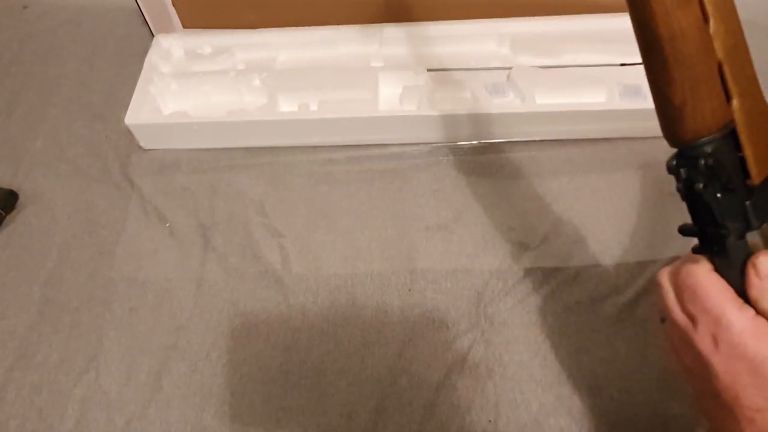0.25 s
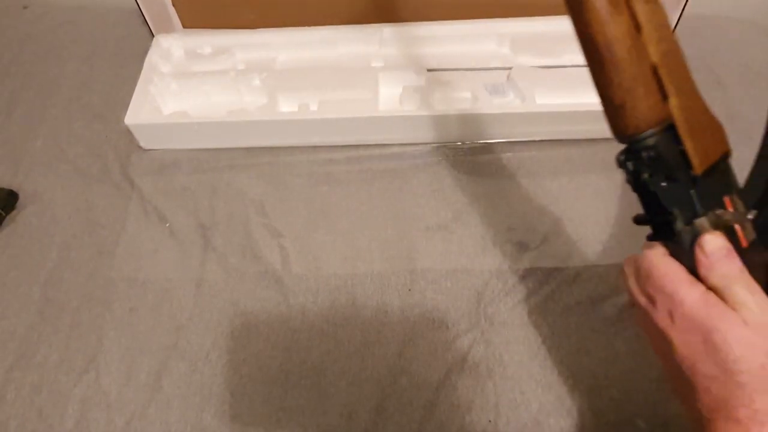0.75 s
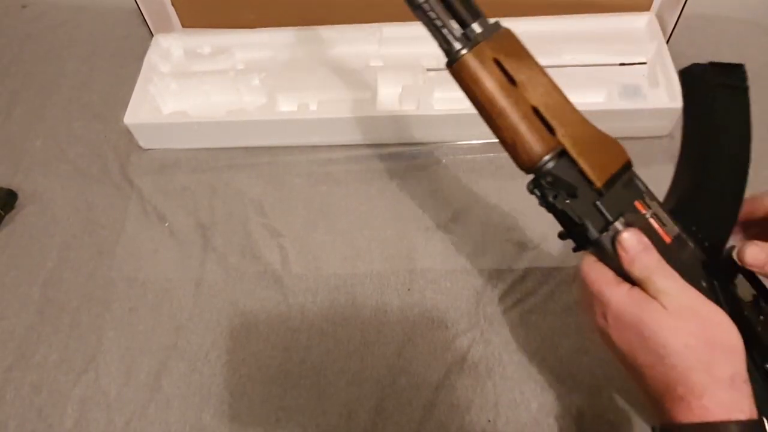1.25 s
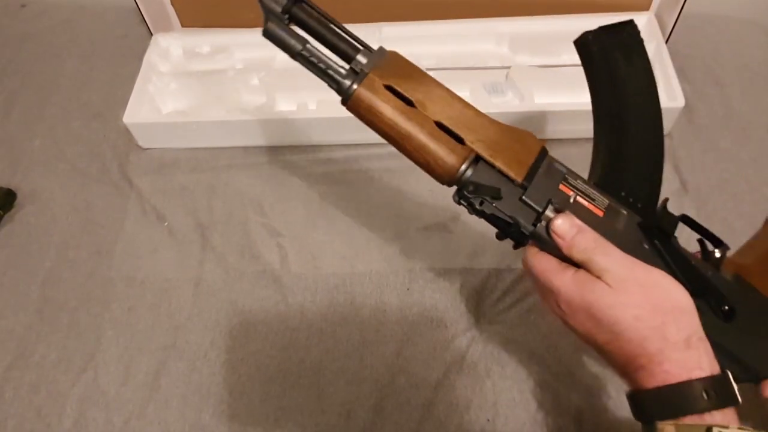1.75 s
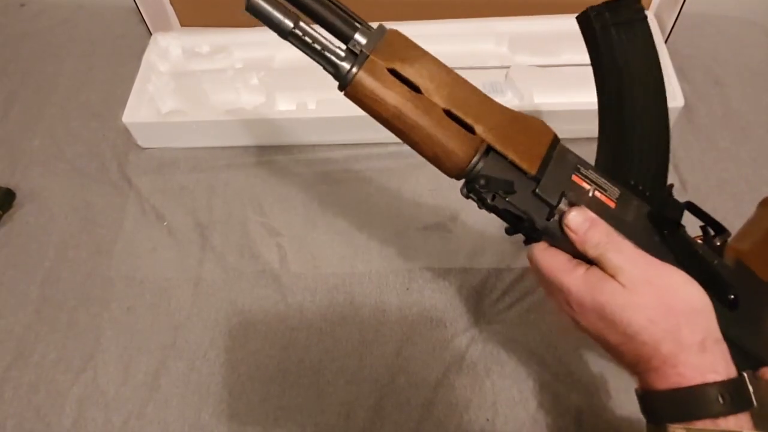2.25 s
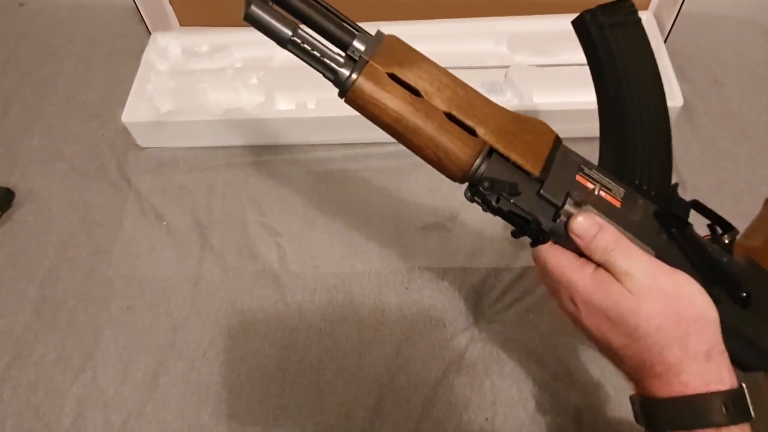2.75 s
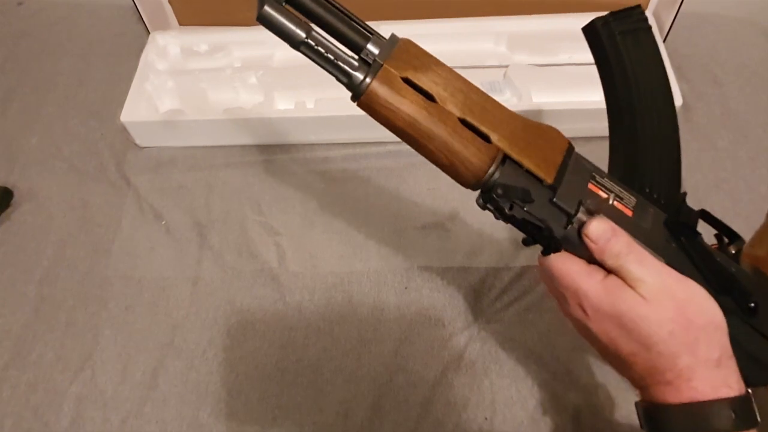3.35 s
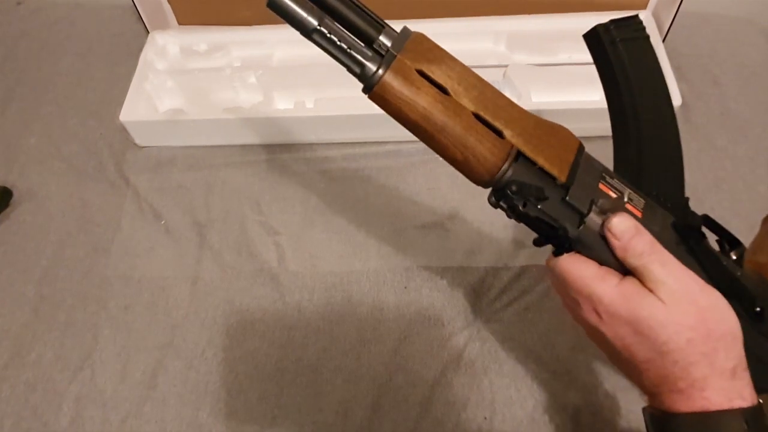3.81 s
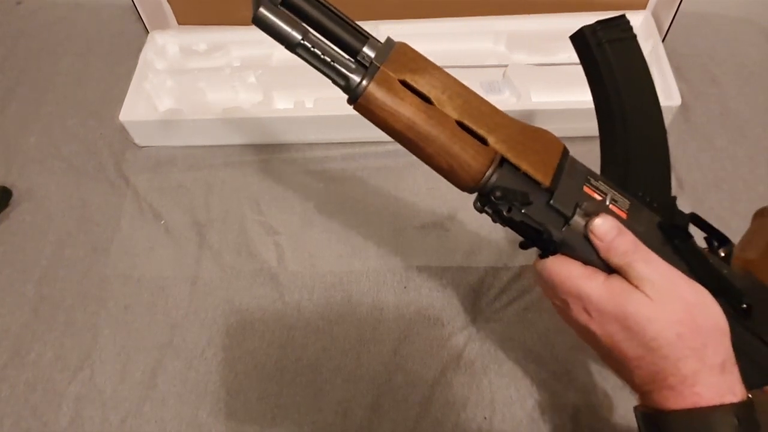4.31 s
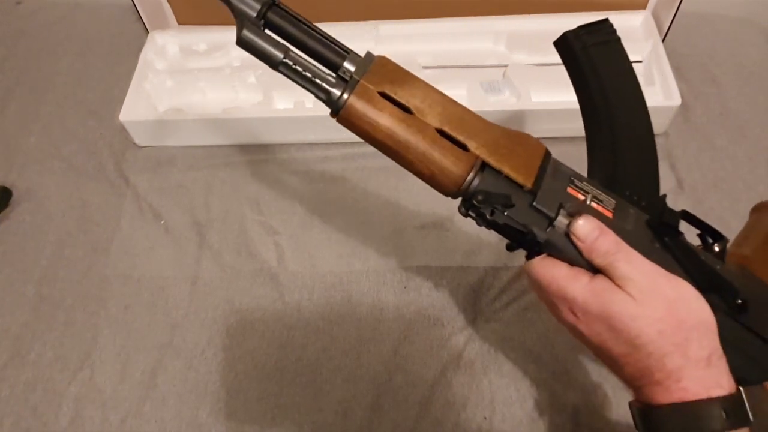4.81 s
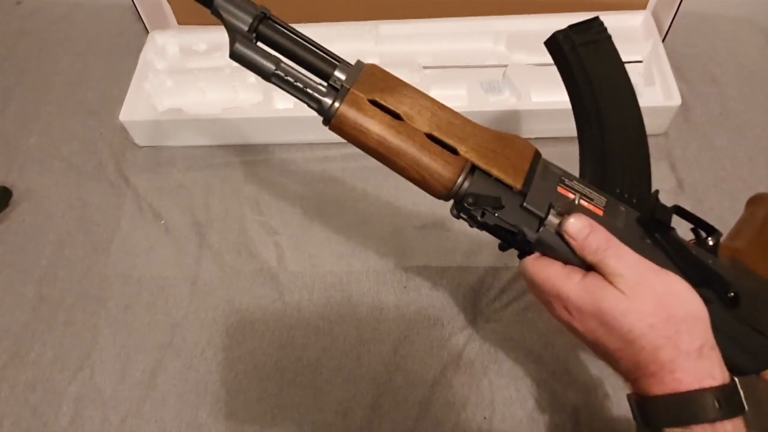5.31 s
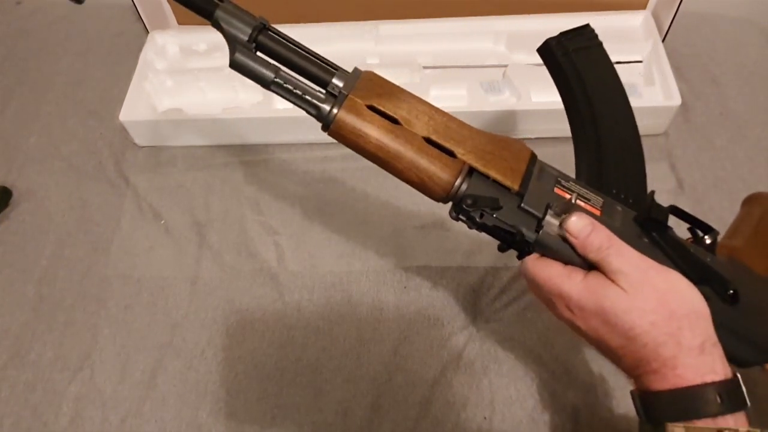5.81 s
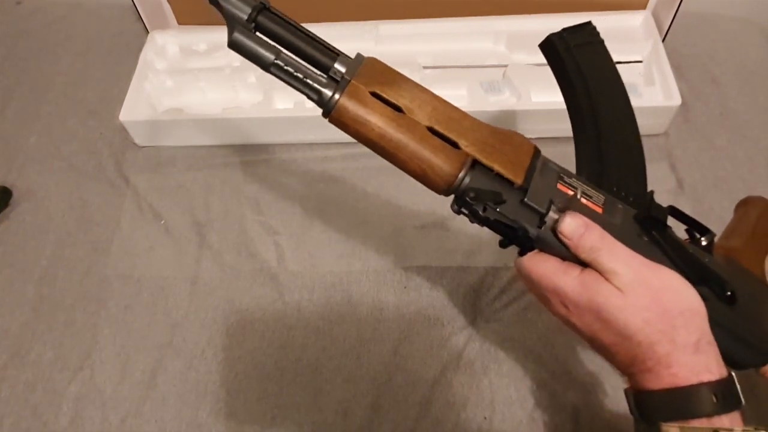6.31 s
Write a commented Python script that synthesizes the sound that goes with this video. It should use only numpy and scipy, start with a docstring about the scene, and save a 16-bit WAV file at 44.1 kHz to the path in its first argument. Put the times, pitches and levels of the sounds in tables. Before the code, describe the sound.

A plastic and metal toy rifle is handled with light knocks and ticks, then a part snaps home in three loud clacks.

```python
"""A toy rifle of plastic and metal is turned in the hands while a part is fitted back on.
Plastic pieces knock, loose fittings tick, fingers rub the shell, and the part catches, then snaps
home in three loud clacks. Each hit is a dry crack; resonances of the room and rifle ring on briefly.
A phone close by in the small furnished room hears it over low rumble, faint hum and its own hiss."""
import sys
import numpy as np
from scipy import signal
from scipy.fft import rfft, irfft
from scipy.io import wavfile
from scipy.ndimage import uniform_filter1d

SR = 44100
rng = np.random.default_rng(int(sys.argv[2]) if len(sys.argv) > 2 else 0)


def wrap_up_sound(samples):
    """Save the sound to the file named by the first command line argument, as 16-bit audio."""
    columns = np.atleast_2d(samples).T
    # keep every value between -1 and 1, then stretch to whole-number steps
    tamed = np.clip(columns, -1, 1)
    steps = np.round(tamed * 32767).astype(np.int16)
    wavfile.write(sys.argv[1], SR, steps)


N = 289296


def rifle_hits(gain_db=11.5, pan_db=1.54):
    """Snaps, knocks and ticks all crack and set off the same resonances, a little to the left."""
    # The part catches, then clacks home three times. Each row: start in seconds, relative level in dB,
    # low knock in dB, resonance of the part in Hz, chatter time in milliseconds.
    snaps = [(2.962, -14, -5, 1850, 1.83), (5.328, -6.5, -3, 1227, 2.8), (5.6204, -11.5, 4.5, 1850, 3.26),
             (5.73, -1.56, -2, 1300, 2.1)]
    # Plastic pieces knock together. Each row: start in seconds, relative level in dB, low knock in dB,
    # hardness (extra treble) in dB, resonance of the part in Hz.
    knocks = [(.001, -24.5, -2.5, -17.5, 2380), (.021, -24, 3, -8, 3700), (.682, -37.5, 2, -10, 1650),
              (.7023, -26, -11, -13.5, 1770), (.763, -37, 5.5, -10.5, 1840), (1.029, -35, 3, 1.5, 1750),
              (1.137, -40, 13.5, -10.5, 1210), (2.3104, -35, -1.5, 0.5, 1630), (2.899, -28.5, 2, -9, 1450),
              (2.909, -33, 7, 5, 2840), (3.046, -36.5, 0, 0, 1420), (3.1222, -40.5, -10, 0, 1400),
              (3.2126, -31.5, -14, -5.5, 1340), (3.966, -26.5, 2.5, -14, 3330),
              (4.1065, -30.5, -1, 4.5, 795), (4.236, -32.5, -7, -8, 2390), (4.252, -27, -0.5, 1.5, 2350),
              (4.9687, -27, 0, -9, 898)]
    # Loose metal fittings tick. Each row: start in seconds, relative level in dB.
    ticks = [(0.2158, -43.5), (.3018, -48.5), (0.357, -49), (0.928, -36.5), (1.109, -46), (1.38, -50.5),
             (2.079, -49), (2.101, -53), (2.211, -45), (3.178, -46), (6.4458, -51.5), (6.5, -55.5)]
    hits = [(s, contact(db, knock, hard_db=2.8, hz=hz, chatter_ms=ms)) for s, db, knock, hz, ms in snaps]
    hits += [(s, contact(*settings)) for s, *settings in knocks]
    hits += [(s, contact(db, knock_db=2, hard_db=5.5, hz=8230, chatter_ms=3)) for s, db in ticks]
    cracks, rings = np.zeros((2, 2, N))
    gain = undb(gain_db + np.array([[pan_db], [-pan_db]]) / 2)
    for start_s, (crack_sound, ring_sound) in hits:
        add(cracks, start_s, gain * crack_sound)
        add(rings, start_s, gain * ring_sound)
    return cracks, rings


def contact(db, knock_db, hard_db, hz, chatter_ms=None, ring_db=-8):
    """One hit gives a dry crack and a stereo ring; harder hits are brighter."""
    # Unless a chatter time is given, every 23.5 dB of hardness halves it.
    chatter_ms = chatter_ms or 2.34 * 2 ** (-hard_db / 23.5)
    touch = touch_tone(knock_db, clack_db=0.29 * hard_db, snap_db=hard_db)
    tone = undb(db) * through(touch, struck_part(hz, db))
    crack_sound = through(crack(chatter_ms), tone)
    ring_sound = undb(ring_db) * np.array([through(side, tone) for side in resonant_ring()])
    return crack_sound, ring_sound


def crack(chatter_ms, shell_t60=0.02, shell_db=-4):
    """Two parts chatter as they meet, then the shell's many vibrations blur the hit."""
    # The tone of the dry crack. Each row: frequency in Hz, level in dB.
    crack_tone = [(20, -52), (70, -25), (150, -21.5), (420, -10), (510, -8.5), (700, -2.5), (1200, -1.5),
                  (2100, -2), (3000, -5.5), (4500, -3.5), (5700, -5), (9000, -10), (12000, -19.5),
                  (15500, -34)]
    t = np.arange(SR // 8) / SR
    progress = t * 1000 / max(chatter_ms, .3)
    chatter = burst(np.sqrt(progress) * np.exp(-progress ** 2), smooth_hz=280)
    shell = burst(undb(-60 * t / shell_t60) * (1 - np.exp(-progress)), smooth_hz=250)
    return through(unit(chatter + undb(shell_db) * shell), unit(response(*np.transpose(crack_tone))))


def resonant_ring(scatter_db=2, build_s=0.0021, spread_rad=.7):
    """Resonances of the room and rifle ring on briefly after each hit, in a different mix each time."""
    # The ringing notes. Each row: pitch in Hz, relative level in dB, seconds to fade by 60 dB (t60).
    ring_notes = [(182.7, -15.5, 0.11), (506, 6.5, 0.2), (535, -2, 0.27), (563, -5, 0.11), (769, 2, 0.25),
                  (873, -12.5, 0.19), (1000, -5, .17), (1096, -10.5, 0.069), (1210, -1.5, 0.18),
                  (1315, -6.5, 0.29), (1455, -4, .2), (1850, -2, 0.074), (1942, -4, 0.095),
                  (2072, -1, 0.036), (2300, -5.5, 0.15), (2810, -16.5, 0.31), (4020, 4, 0.077),
                  (4100, -7, 0.18), (5260, -8.5, .21), (5100, -1, 0.31), (5150, -6.5, 0.16),
                  (5782, -20.5, 0.11), (6200, 2, 0.11)]
    t = np.arange(SR // 3) / SR
    hz, db, t60 = np.transpose(ring_notes)[:, :, None]
    strength = undb(db + scatter_db * rng.standard_normal(hz.shape))
    phase = 2 * np.pi * rng.random(hz.shape)
    mic_shift = spread_rad * np.sqrt(hz / 500) * rng.standard_normal((2, *hz.shape))
    fade = unit(undb(-60 * t / t60) * (1 - np.exp(-t / build_s)))
    return unit(np.sum(strength * fade * np.sin(2 * np.pi * hz * t + phase + mic_shift), axis=1))


def struck_part(hz, force_db, boost_db=6, octaves=0.31, latch_hz=5550, latch_db=4, latch_octaves=0.11):
    """The struck part boosts a broad band of pitches; the hardest hits also ring the metal latch."""
    grid_hz = np.geomspace(100, SR / 2, num=200)
    resonance = boost_db * np.exp(-(np.log2(grid_hz / hz) / octaves) ** 2)
    latch = latch_db * undb(force_db) * np.exp(-(np.log2(grid_hz / latch_hz) / latch_octaves) ** 2)
    return response(grid_hz, resonance + latch - 2)


def touch_tone(knock_db, clack_db, snap_db):
    """The tone of one contact: soft ones knock, hard edges snap."""
    return response([250, 450, 570, 800, 1300, 1900, 3000, 4500],
                    [knock_db / 2, knock_db, knock_db, 0, 0, clack_db, clack_db, snap_db])


def finger_rubs(grains_per_s=800, spread_db=5.5, grain_ms=1.26, gain_db=2):
    """Skin catches and slips on the shell in tiny clicks; dull strokes have less treble, more knock."""
    # Finger strokes. Each row: middle in seconds, half length in seconds, relative level in dB,
    # dullness in dB.
    strokes = [(.455, .11, -68, 18.5), (0.886, .025, -63.5, 6.5), (1.451, 0.17, -69.5, -2.5),
               (1.882, 0.26, -65, 0.5), (2.291, 0.065, -63.5, 7.5), (2.72, .1, -69, 1.5),
               (6.055, 0.048, -72, 10), (6.436, 0.13, -69.5, -0.5)]
    out, t = np.zeros(N), np.arange(N) / SR
    for middle_s, half_s, db, dull_db in strokes:
        span = np.abs(t - middle_s) < 2 * half_s
        n = span.sum()
        sizes = undb(spread_db * np.minimum(rng.exponential(size=n), 3))
        grains = (rng.random(n) < grains_per_s / SR) * rng.choice([-1, 1], n) * sizes
        friction = through(unit(grains) * np.sqrt(n), crack(grain_ms))
        stroke = through(friction, touch_tone(dull_db, -dull_db, -0.31 * dull_db))
        swell = np.exp(-((t[span] - middle_s) / half_s) ** 2)
        out[span] += stroke * swell * undb(db + gain_db)
    return out


def room(x, t60=0.21, echo_db=-1, right_direct_db=-3, first_s=0.0095, first_db=-1, first_width_s=0.003):
    """Sound arrives directly, then as early echoes and a short tail; the two sides share bass echoes."""
    t = np.arange(2 * (SR // 5)) / SR
    tail = undb(-60 * t / t60) * np.clip(t / first_s, 0, 1) ** 2
    early = undb(first_db) * np.exp(-((t - first_s) / first_width_s) ** 2) / 2
    left, separate = burst(tail + early, smooth_hz=100), burst(tail + early, smooth_hz=80)
    bass = 1 / (1 + (np.fft.rfftfreq(len(t), 1 / SR) / 600) ** 4)  # below about 600 Hz
    right = irfft(rfft(left) * np.sqrt(bass) + rfft(separate) * np.sqrt(1 - bass)) * (t < 1.3 * t60)
    direct = 1. * (t == 0)
    # Sound bends round the phone to the right microphone, which shifts the phase of the middle pitches.
    bent = signal.lfilter([.6, -1.5, 1], [1, -1.5, .6], direct)
    return np.array([through(x[0], direct + undb(echo_db) * left),
                     through(x[1], undb(right_direct_db) * bent + undb(echo_db) * right)])


def background(rumble_db=-76, apart_db=-10, hiss_db=-59):
    """Room rumble, nearly alike on both sides, with hum and microphone hiss; all sink at the last clack."""
    # The room's rumble. Each row: frequency in Hz, relative level in dB.
    rumble_tone = [(20, -24), (40, -9), (60, -2), (100, -2), (135, -11.5), (200, -9.5), (320, -9),
                   (450, -18), (800, -23.5), (2000, -45.5)]
    # The microphones' hiss. Each row: frequency in Hz, left and right relative levels in dB.
    hiss_tone = [(300, -13.5, -5), (1300, -12, -10), (2940, -10.5, -6), (3660, -17.5, -25), (4340, -3, -15),
                 (5400, 8.5, -10), (6287, 1.5, -19.5), (7560, -25.5, -39), (8780, -1.5, -32),
                 (9800, -20, -35.5), (11200, -24, -20), (12700, -48.5, -46.5)]
    tone = unit(response(*np.transpose(rumble_tone), size=8192))
    shared, side = (through(rng.standard_normal(N), tone) for _ in range(2))
    rumble = shared + undb(apart_db) * side * np.array([[1], [-1]])
    hz, *sides_db = np.transpose(hiss_tone)
    hiss = np.array([through(rng.standard_normal(N), response(hz, db)) for db in sides_db])
    sink_db = np.interp(np.arange(N) / SR, [5.7, 5.97], [1.15, -4])
    return (undb(rumble_db) * rumble + mains_hum() + undb(hiss_db) * hiss) * undb(sink_db)


def mains_hum():
    """Mains electricity hums faintly somewhere in the room."""
    # The hum's notes. Each row: pitch in Hz, relative level in dB.
    hum_notes = [(100, -92.5), (200, -84.5)]
    t = np.arange(N) / SR
    return sum(np.sqrt(2) * undb(db) * np.sin(2 * np.pi * (hz * t + rng.random())) for hz, db in hum_notes)


def burst(envelope, smooth_hz):
    """A spray of tiny impacts follows a loudness curve, evened out from bass to treble."""
    noise = rng.standard_normal(len(envelope)) * envelope
    power = uniform_filter1d(np.abs(rfft(noise)) ** 2, int(smooth_hz * len(noise) / SR) + 1)
    flatten = response(np.fft.rfftfreq(len(noise), 1 / SR) + 1, -10 * np.log10(power))
    return unit(through(noise, flatten))


def response(hz, db, size=2048):
    """Build a filter with the given level at each frequency."""
    bin_hz = np.arange(size // 2 + 1) * SR / size + 1
    log_gain = np.log(undb(np.interp(np.log(bin_hz), np.log(hz), db)))
    # Folding the cepstrum (the log spectrum turned into time) makes the filter ring only after a hit.
    cepstrum = irfft(log_gain)
    cepstrum[1:size // 2] *= 2
    cepstrum[size // 2 + 1:] = 0
    return irfft(np.exp(rfft(cepstrum)))


def through(x, impulse_response):
    """Pass a sound through a filter, keeping its length."""
    return signal.fftconvolve(x, impulse_response)[:len(x)]


def add(track, start_s, x):
    """Mix a stereo sound into the track."""
    start = max(int(start_s * SR), 0)
    track[:, start:start + x.shape[1]] += x[:, :N - start]


def undb(db):
    """Turn decibels into a multiplier."""
    return 10 ** (np.asarray(db) / 20)


def unit(x):
    """Scale a sound so its energy is 1."""
    return x / np.sqrt(np.sum(x ** 2, axis=-1, keepdims=True))


def scene():
    """The handled rifle in the room, heard through the phone's two microphones."""
    # The tone of the microphone openings. Each row: frequency in Hz, left and right gains in dB.
    mic_tone = [(320, 1, 6.5), (1000, 1.5, -0.5), (2220, 2.5, 6.5), (3700, 5, -3), (5050, 4, 0.5),
                (5890, 11, 3.5), (6580, -0.5, 1.5), (7480, -13.5, -18.5), (8070, 2.5, -31.5),
                (9200, 5, -12.5), (12300, -2.5, 4.5), (15000, -6.5, -6.5)]
    hz, *sides_db = np.transpose(mic_tone)
    noise_floor = background()
    cracks, rings = rifle_hits()
    air = room(cracks + finger_rubs()) + rings
    return np.array([through(side, response(hz, db)) for side, db in zip(air, sides_db)]) + noise_floor


def record(dry):
    """The phone rounds off the loudest peak and cuts the highest treble."""
    ceiling, top_hz = 1.15, 15800
    rounded = ceiling * np.tanh(dry / ceiling)
    return signal.sosfilt(signal.ellip(8, .2, 70, top_hz, fs=SR, output="sos"), rounded)


dry = scene()
out = record(dry)
wrap_up_sound(out)
```